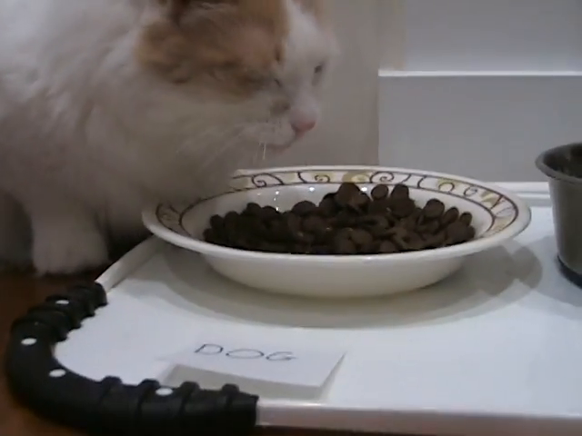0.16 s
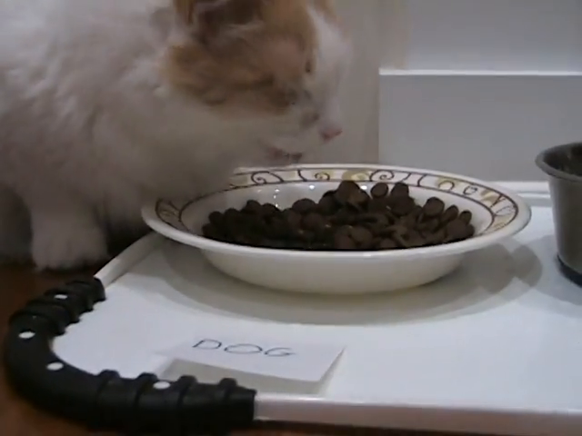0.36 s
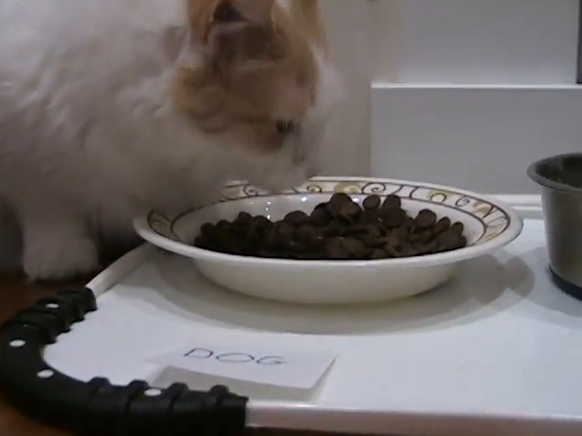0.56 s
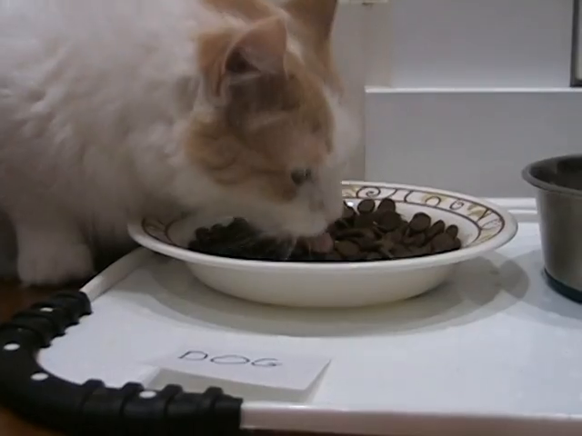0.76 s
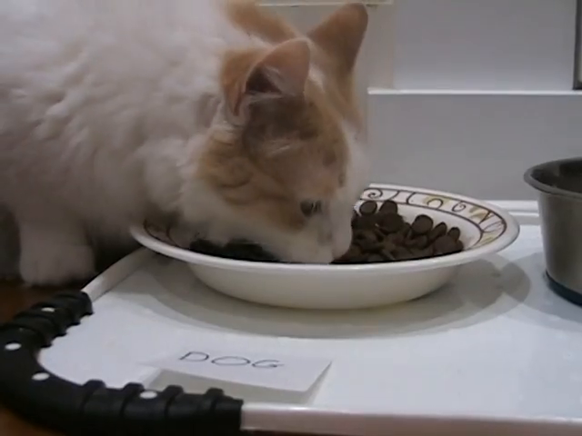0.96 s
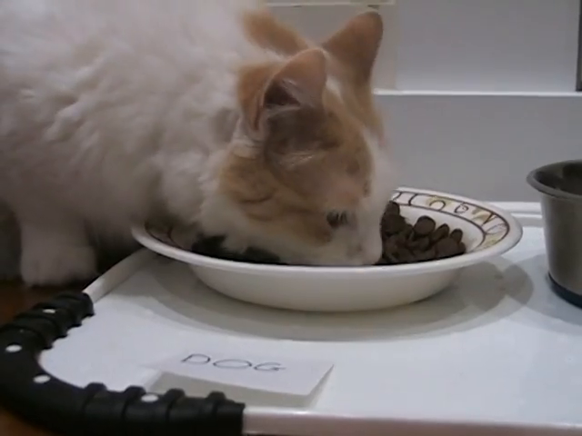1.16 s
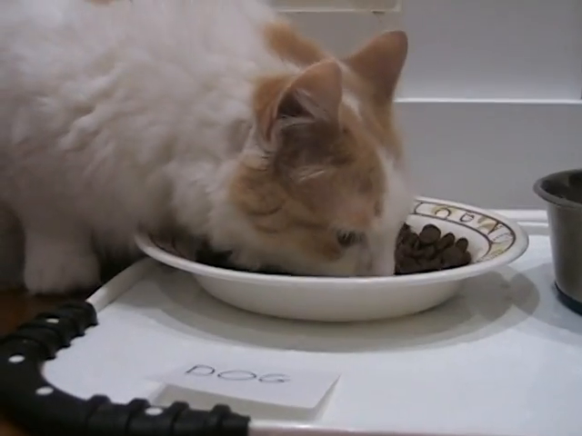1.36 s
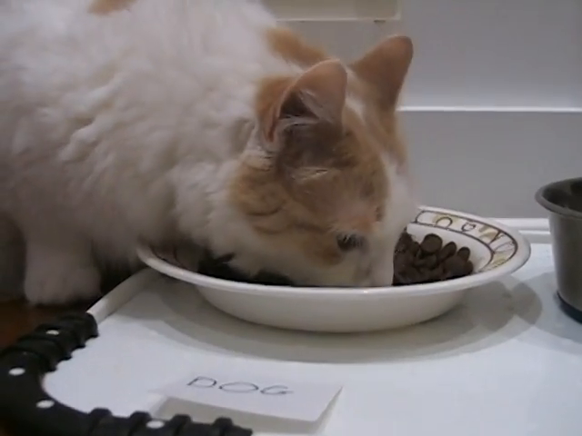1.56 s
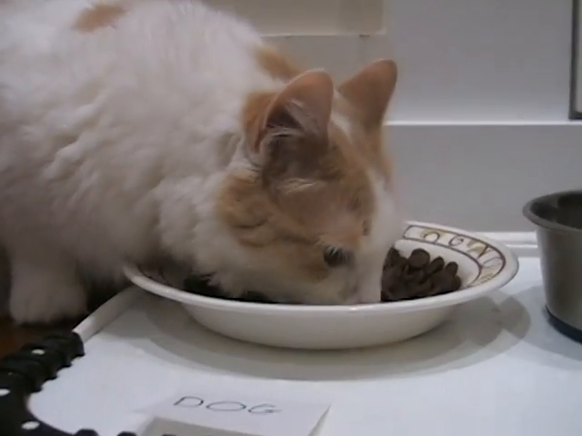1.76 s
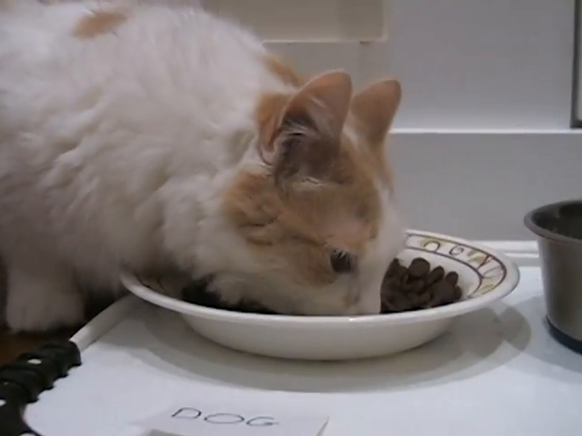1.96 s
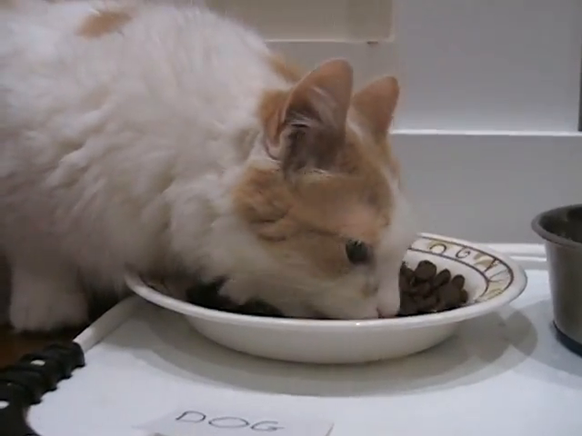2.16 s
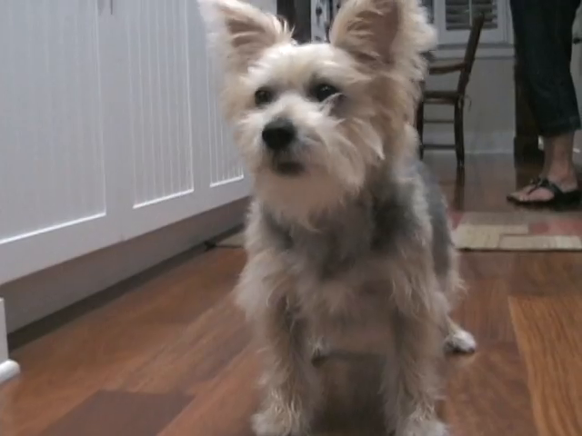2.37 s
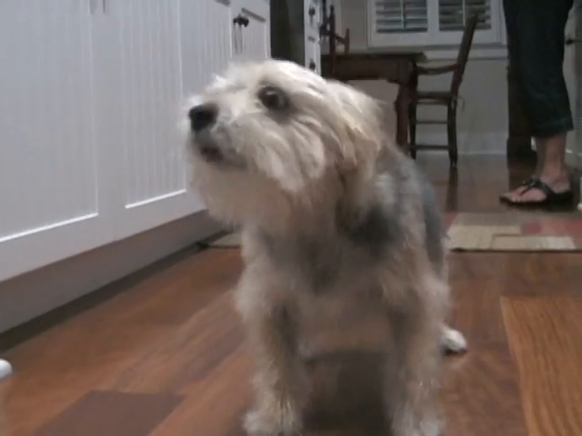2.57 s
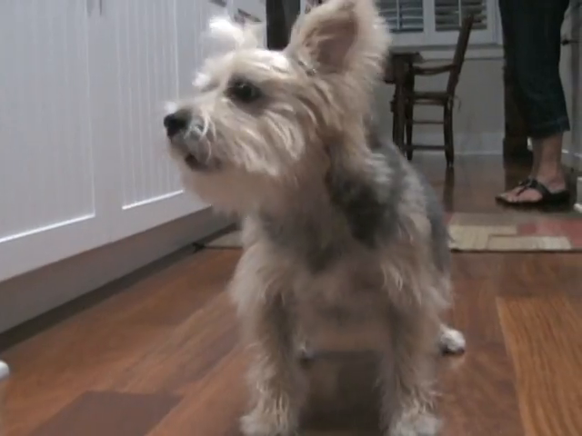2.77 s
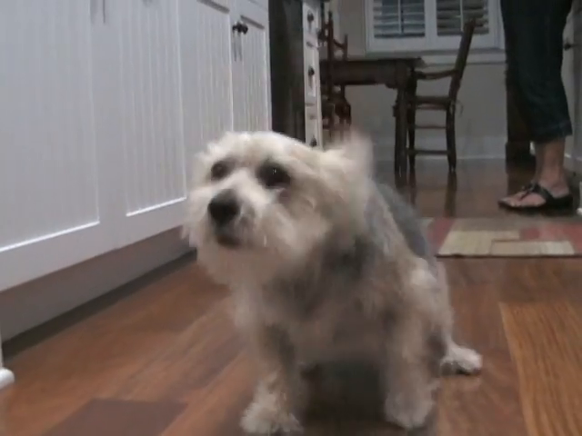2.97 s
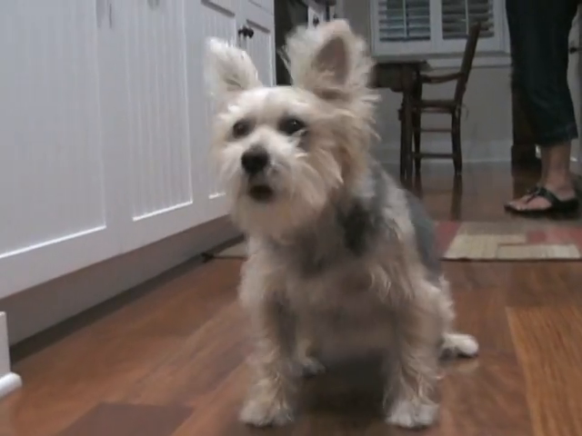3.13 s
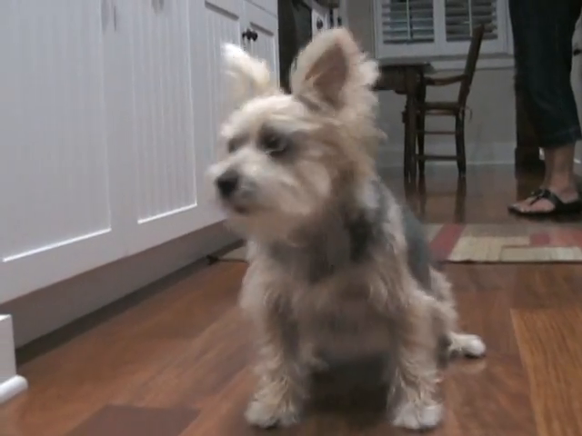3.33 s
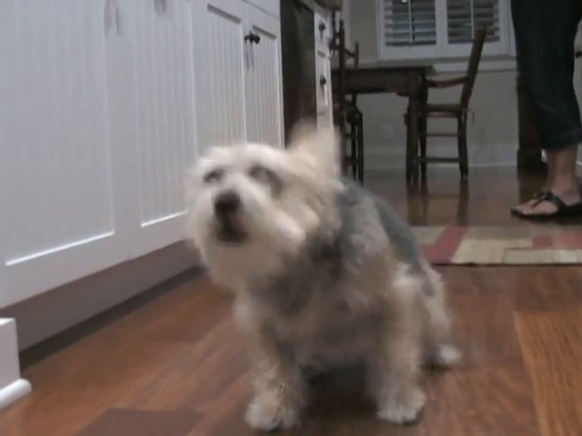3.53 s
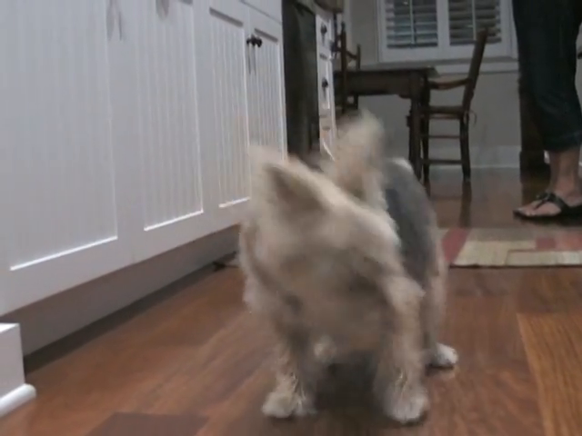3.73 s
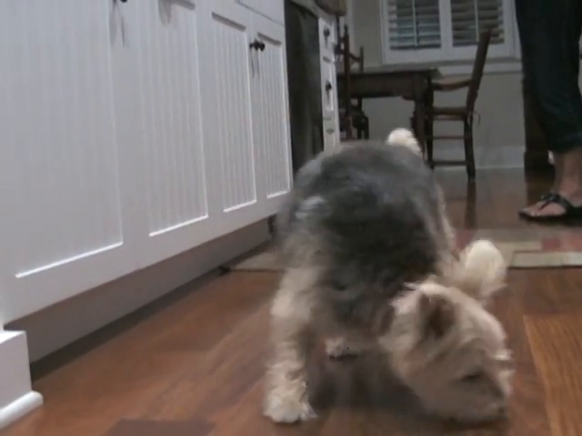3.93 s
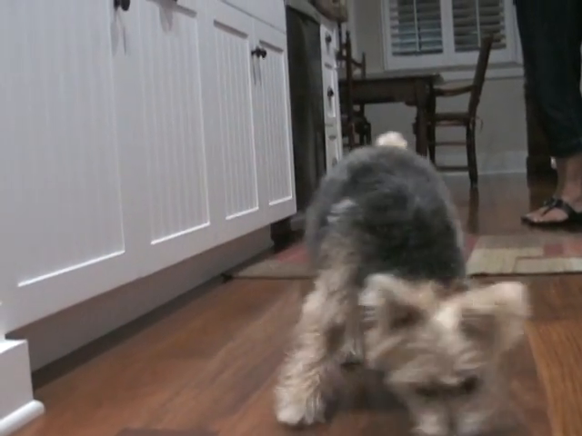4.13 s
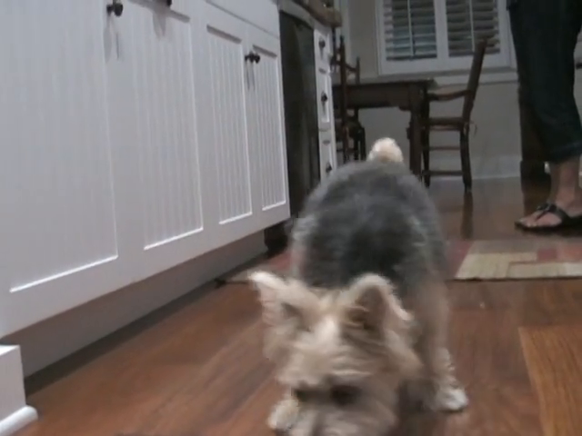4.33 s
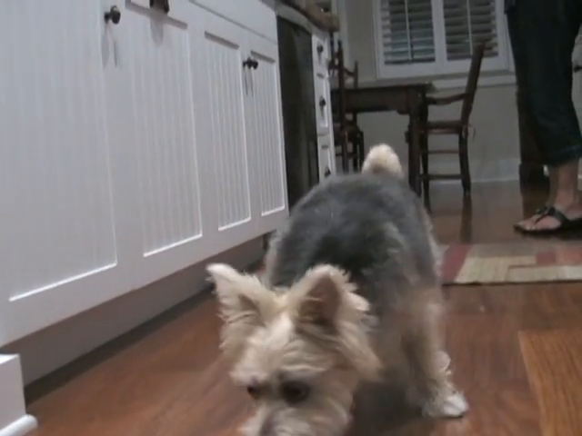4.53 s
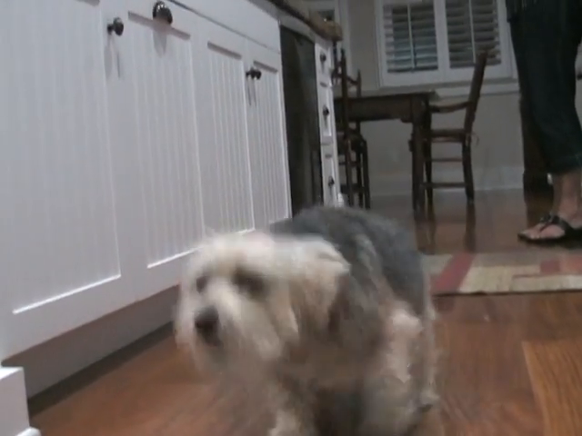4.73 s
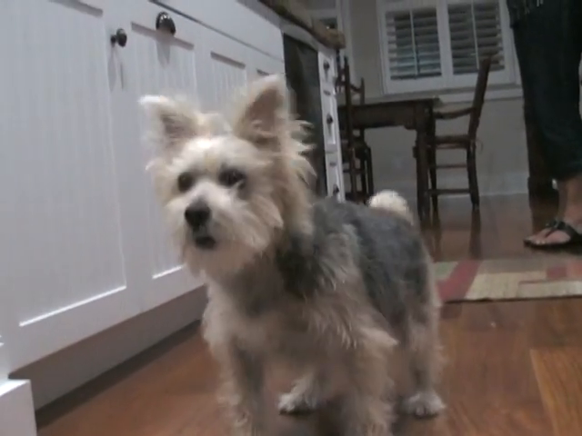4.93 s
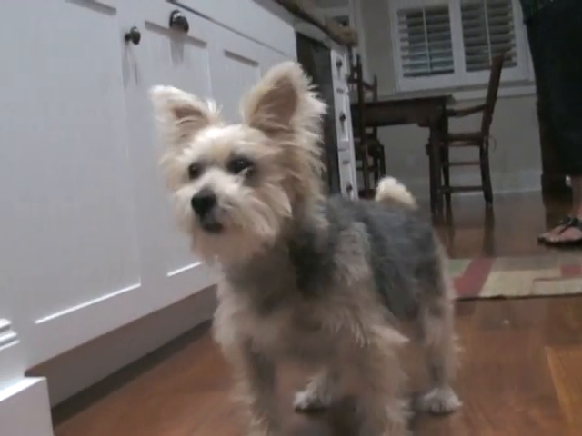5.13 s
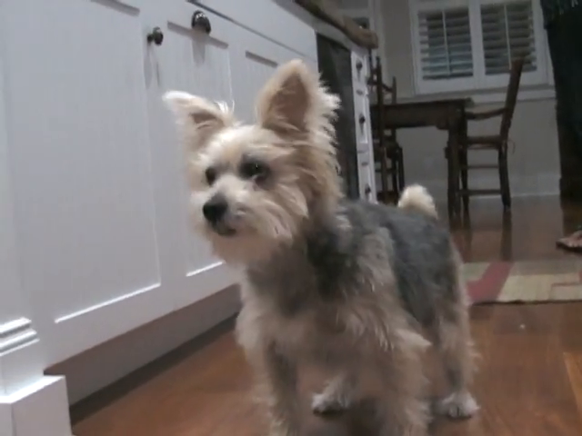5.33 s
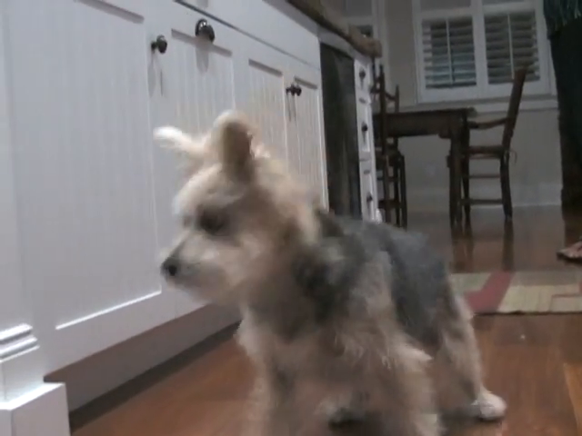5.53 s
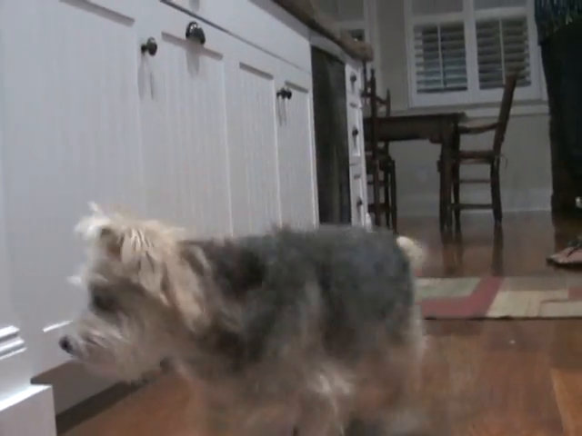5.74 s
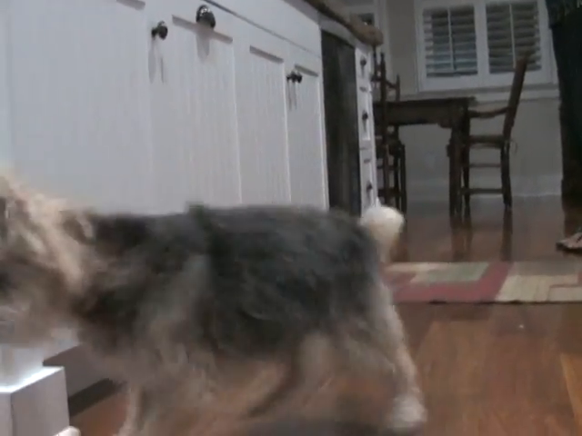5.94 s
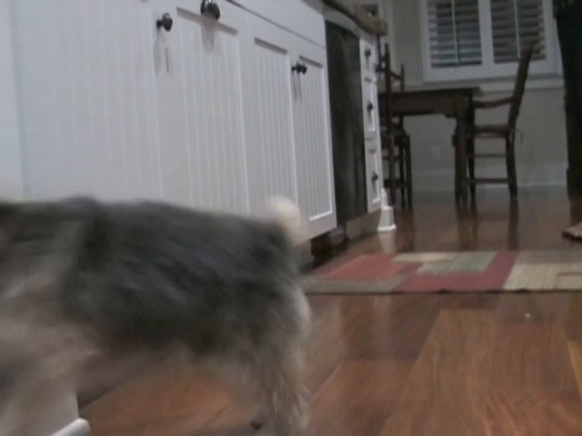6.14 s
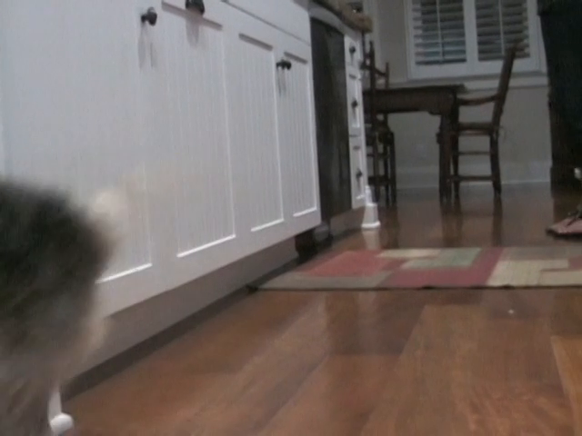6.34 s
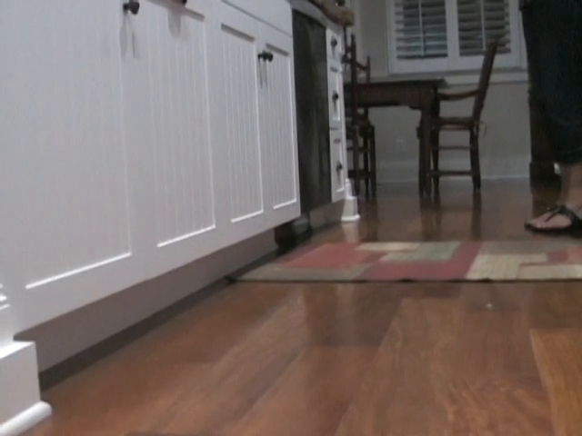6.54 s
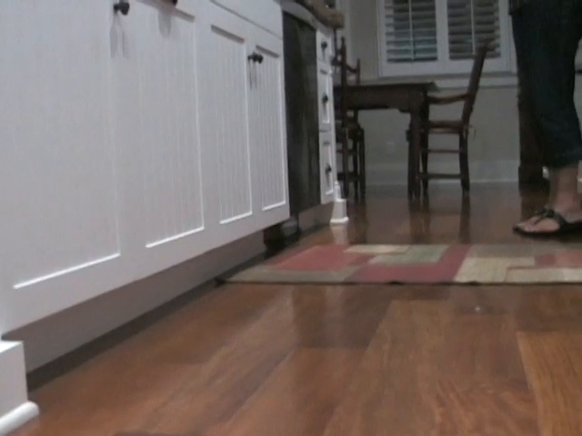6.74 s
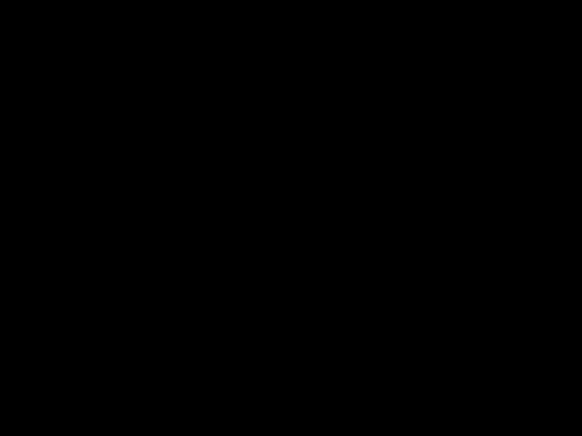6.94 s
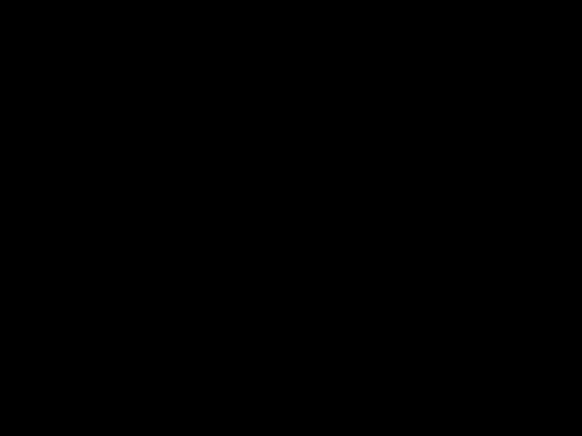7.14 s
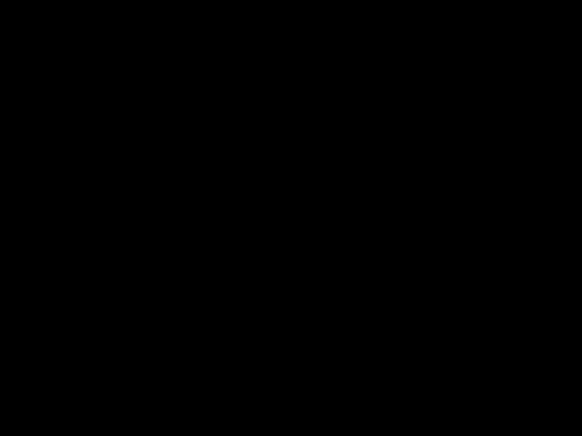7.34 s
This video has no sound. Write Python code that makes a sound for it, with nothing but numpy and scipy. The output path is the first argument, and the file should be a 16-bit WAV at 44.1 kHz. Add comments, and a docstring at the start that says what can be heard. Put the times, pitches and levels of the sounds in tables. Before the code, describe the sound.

From 0 to 2.2 s there is only soft room hiss, a thin steady camera whine, a faint fluttering chirr and a tiny claw tick at 0.3 s. A hard cut lets in the tail of an earlier bark, with slightly darker hiss and faint fridge hum. Claws and pads knock the wooden floor at 2.43 s; sharp, rising yaps burst out at 2.48 and 2.87 s, close and overloaded, the level ducking before the kitchen echo swells. A low throbbing growl with whistling breath at 3.15 s leads into a bark at 3.45 s. A tiny squeak at 4.07 s, a soft snort around 4.3 s, another yap at 4.67 s, then a squeak and paw thump at 4.85 s. From 5.4 to 6.6 s irregular claw ticks and brushing scuffs trot off. Hiss remains until an abrupt stop at 6.8 s, then silence.

```python
"""A bare kitchen in two shots, a small dog close to the camera's microphone.
First come room hiss, motor whine, a faint chirr and one claw click; a cut opens on the echo of an earlier bark.
Claws click and the dog barks twice, growls with a whistling breath, barks, squeaks, snorts, barks and squeaks again.
It trots off on clicking claws before the camera stops. Voices are overtones through a throat, claws are noise cracks.
The barks overload the camera, whose gain control ducks and then lifts the echo."""
import sys
import numpy as np
from scipy import signal
from scipy.fft import rfft, irfft, next_fast_len
from scipy.io import wavfile
from scipy.ndimage import map_coordinates

SR = 44100
rng = np.random.default_rng(int(sys.argv[2]) if len(sys.argv) > 2 else 0)


def generate_wav(sig):
    """Save sig (samples, or channels by samples) to the path in sys.argv[1] as 16-bit PCM at SR."""
    pcm = np.round(np.clip(np.atleast_2d(sig).T, -1, 1) * 32767).astype(np.int16)
    wavfile.write(sys.argv[1], SR, pcm)


N = 326271
T = np.arange(N) / SR
CUT, STOP = 2.214, 6.817  # the second shot begins, the camera stops (s)


# Barks close to the microphone; the first falls before the cut, so only its echo is heard.
# Each row: start in seconds, climb and fall in seconds, first, top and last pitch in Hz, slow start and
# slow finish as exponents, attack in seconds, level in dB, slack in dB, its place as share of the climb,
# loss in dB over the fall, tilt in dB per octave, rasp in seconds, rasp roughness 0-1, mouth in Hz, mouth in dB.
BARK_CALLS = [(1.82, 0.07, 0.015, 560, 721.5, 700, 1.08, 2.74, 0.042, 4, -4.5, 0.57, -36, -5, 0.066, 0.37, 1360, 4.5),
              (2.479, .084, 0.025, 253.3, 759.8, 692, 1.71, 3.8, 0.014, 6, 1.5, 0.46, -32.5, 1.2, 0.043, 0.24, 767, 8.5),
              (2.873, 0.089, 0.063, 387.3, 819, 442, 1.01, 1.08, 0.031, 4, -5.5, 0.65, -16, -0.5, 0.019, 0.3, 1748, 10),
              (3.451, .094, .07, 313, 828, 264.7, .86, 1.6, .021, 6, -7.5, 0.53, -31.5, -2, 0.018, .12, 1760, 8),
              (4.6651, 0.094, 0.017, 292, 741, 715, 0.82, 1.9, 0.011, 4.5, -6, 0.87, -42, -1.5, .016, .2, 2024, 9)]
# The growl between the barks. Each row: time in seconds, pitch in Hz, level in dB.
GROWL_PATH = [(3.155, 150.8, -41), (3.201, 149.8, -27), (3.279, 142.1, -31.5), (3.391, 158.9, -22),
              (3.454, 175.3, -24)]
GROWL_TILT_DB, GROWL_ROUGH = -1.5, 0.19  # tilt per octave at a level of 0 dB; roughness 0-1
GROWL_MOUTH = 463, 8  # Hz, dB
# Floor and cupboard doors answer first. Each row: delay in seconds, level in dB against the direct sound.
FIRST_REFLECTIONS = [(.0032, -13), (.0085, -12), (.015, -9), (.024, -20)]


def dog():
    """Throat sounds reach the microphone direct and by echo; breath noises come without echo."""
    out = np.zeros((2, N + 3 * SR))
    for *call, mouth_hz, mouth_db in BARK_CALLS:
        add(out, call[0], voice(bark(*call), mouth_hz, mouth_db), wet_db=-12, near=FIRST_REFLECTIONS)
    growl = [(s, hz, db, GROWL_TILT_DB + DULLER * db, GROWL_ROUGH) for s, hz, db in GROWL_PATH]
    add(out, GROWL_PATH[0][0], voice(growl, *GROWL_MOUTH), wet_db=-5.5, near=FIRST_REFLECTIONS)
    squeaks(out)
    return out[:, :N] * (T > CUT) + snort() + gasp()


ONSET_DB, SLACK_WIDTH = -37.5, 0.096  # level at the start; width of the slack as share of the climb
DULLER = 0.56  # tilt lost (dB per octave) for each dB under full level
SAG_DB, DARKEN_DB = -4.5, -1.5  # level and tilt (per octave) lost over the climb
SMOOTH, SPENT = .025, .15  # roughness 0-1 in the climb, and added by the end of the fall


def bark(s, climb, fall, first_hz, top_hz, last_hz, slow_start, slow_finish, attack, db,
         slack_db, slack_at, loss_db, tilt_db, rasp, rasp_rough):
    """Rows for the voice: a raspy start, a climb in pitch that slackens in strength midway, a fading fall."""
    t = np.arange(0, climb + fall, .001)
    up = np.minimum(t / climb, 1)
    down = np.maximum(t - climb, 0) / fall
    climbed = 1 - (1 - up ** slow_start) ** slow_finish
    hz = first_hz + (top_hz - first_hz) * climbed + (last_hz - top_hz) * down
    effort_db = ONSET_DB * np.maximum(1 - t / attack, 0) ** 2.38 + loss_db * down
    slack = np.exp(-((up - slack_at) / SLACK_WIDTH) ** 2)
    level_db = db + effort_db + slack_db * slack + SAG_DB * up
    tilt = tilt_db + DULLER * effort_db + DARKEN_DB * up
    rough = SMOOTH + rasp_rough / (1 + (t / rasp) ** 8) + SPENT * down
    return np.transpose([s + t, hz, level_db, tilt, rough])


# Colour of the dog's throat before the mouth adds its peak. Each row: frequency in Hz, level in dB.
THROAT_COLOUR = [(130, -11), (300, -0.5), (700, 6), (1200, 3), (2000, -6), (2500, -22.5), (3200, -19),
                 (4100, -20), (9000, -28.5), (14000, -29.5)]
SKEW = 0.63  # phase of the overtones (rad): how lopsided each cycle is
YAP_HZ, YAP_OCTAVES, YAP_DB = 5400, .12, -18.5  # a high ring that grows with the pitch; dB at 750 Hz
THROB_RATE, THROB_CREST, THROB_DEPTH = 28.5, 3.39, .7  # the growl throbs: per s, a crest at s, depth 0-1


def bump(f, centre, octaves):
    """Bell curve around a frequency on a log axis."""
    return np.exp(-(np.log2((f + 1) / centre) / octaves) ** 2)


def voice(rows, mouth_hz, mouth_db):
    """Vocal folds sound overtones through the throat; when rough, pitch and size tremble and breath hisses."""
    s, *cols = np.transpose(rows)
    t = np.arange(s[0], s[-1], 1 / SR)
    hz, db, tilt_db, rough = (np.interp(t, s, c) for c in cols)
    rough = np.clip(rough, 0, 1)

    def tract_db(f):
        return along(THROAT_COLOUR, f) + mouth_db * bump(f, mouth_hz, 0.097)

    trembling_hz = hz * (1 + .2 * rough * wobble(160, size=len(t)))
    phase = 2 * np.pi * np.cumsum(trembling_hz) / SR
    k = np.arange(1, 25)[:, None]  # overtone numbers
    yap = (hz / 750) ** 2.5 * amp(YAP_DB) * bump(k * hz, YAP_HZ, YAP_OCTAVES)
    size = amp(tilt_db * np.log2(k) + tract_db(k * hz)) + yap
    # the higher the overtone, the less steady
    flutter = (.015 + .3 * rough) * k * [wobble(150, size=len(t)) for _ in k]
    tone = np.sum(size * np.cos(k * phase + SKEW + flutter), axis=0)
    tone /= np.sqrt(np.sum(size ** 2, axis=0) / 2)
    if hz.max() < 200:  # a growl throbs slowly
        tone *= 1 + THROB_DEPTH * np.cos(2 * np.pi * THROB_RATE * (t - THROB_CREST))
    else:  # in a rough bark strong and weak cycles alternate
        tone *= 1 + 0.88 * rough * np.cos(phase / 2)
    hiss = rng.standard_normal(len(t))
    breath = unit(filtered(hiss, lambda f: amp(tract_db(f) - 11.0 * np.log2(1 + f / 500)) * (f > 200)))
    return amp(db + 6 * rough * wobble(60, size=len(t))) * (tone + .8 * rough * breath)


# Noise at the dog's nose. Each row: frequency in Hz, relative level in dB per Hz.
NOSE_COLOUR = [(60, -30.5), (130, -11), (300, -13.5), (800, -12), (1500, -24.5), (2600, -45), (5000, -88.5)]


def snort():
    """A burst of noise with the colour of the nose, its level trembling."""
    puff = gate(4.284, -35.5, (.02, 0.081, .35))
    return puff * amp(1.7 * wobble(130)) * rush(NOSE_COLOUR)


# Whistling resonances of the breath. Each row: frequency in Hz, width in Hz, level in dB.
NOSTRIL_RINGS = [(2413, 72, 5.5), (4300, 280, 0.5), (9500, 1200, -4.5)]


def gasp():
    """Breath whistles under the growl: noise through narrow resonances."""
    return gate(3.22, -46, (.15, .1, .04)) * narrow(NOSTRIL_RINGS)


# Two thin squeaks. Each row: start in seconds, length in seconds, level in dB.
SQUEAK_TIMES = [(4.065, 0.024, -35), (4.854, 0.0099, -31.5)]
# Partials of a squeak. Each row: frequency at its start in Hz, level in dB.
SQUEAK_PARTIALS = [(3340, 0), (6680, 6), (9350, -14)]


def squeaks(out):
    """Sine partials rise slightly in pitch under a half-sine swell."""
    for s, length, db in SQUEAK_TIMES:
        t = np.arange(0, length, 1 / SR)
        rising = t + .08 * t * t
        tone = sum(amp(level) * np.sin(2 * np.pi * hz * rising) for hz, level in SQUEAK_PARTIALS)
        add(out, s, amp(db) * np.sin(np.pi * t / length) * tone, wet_db=-17.5)


# Claws on the kitchen boards. Each row: time in seconds, peak of the crack in dB, click pitch in Hz.
CLAW_CLICKS = [(0.3, -31.5, 6300), (2.4283, -10.5, 4100), (2.4397, -16, 6770), (2.4495, -2.5, 4250),
               (2.657, -14.5, 2400), (3.0836, -10, 3500), (3.8383, -24.5, 8200), (4.1745, -29, 8600),
               (4.853, -13, 4220), (4.878, -20, 3960), (5.356, -29, 2280), (5.58, -18, 1800),
               (5.5942, -23, 1820), (5.611, -30, 1500), (5.679, -27, 3020), (5.747, -17, 3560),
               (5.777, -16, 7000), (5.834, -18.5, 5870), (5.91, -24, 6680), (5.959, -22.5, 6440),
               (5.989, -26.5, 3940), (6.0415, -22, 3070), (6.131, -21, 8800), (6.173, -24, 2550),
               (6.184, -23.5, 2360), (6.3495, -19.5, 2950), (6.366, -21, 2600), (6.549, -23.5, 2420),
               (6.561, -28, 3450), (6.598, -28, 1000), (6.639, -26.5, 2280)]
# Colour of a claw's crack and of the scuffs. Each row: frequency in Hz, relative level in dB per Hz.
CLAW_COLOUR = [(500, -40), (1200, -2.5), (2500, -5.5), (4000, -3.5), (7000, -9), (10000, -10.5),
               (12500, -15), (14500, -54.5)]
# Resonances of the floor boards. Each row: frequency in Hz, width in Hz, level in dB.
BOARD_MODES = [(148, 20, -13.5), (508, 100, -4.5), (950, 190, -1)]
# A pad lands on the board. Each row: time in seconds, peak in dB.
PAD_THUMPS = [(2.4281, -13), (2.4403, -8), (2.4492, -6.5), (3.0838, -15.5), (4.851, -3), (5.356, -37),
              (5.5942, -26), (6.5994, -23.5), (6.638, -27.5)]
# Pads and fur brush the boards. Each row: crest in seconds, level in dB.
SCUFF_TIMES = [(5.588, -32.5), (5.73, -36.5), (5.92, -38.5), (6.14, -47), (6.37, -41.5)]
SCUFF_SHAPE = 0.19, 0.0033, 0.38  # attack, hold, release (s)
PATTER_START, PATTER_END, PATTER_DB = 5.5, 6.0, -25  # ticks scattered in the trot: s, s, highest peak
CRACK_T60 = .022  # s
KNOCK_DB = -16  # the board under a claw, against the click


def paws():
    """Each claw cracks around its own pitch and knocks the board; the pads thump it and scuff in grains."""
    out, t = np.zeros((2, N + 3 * SR)), np.arange(SR // 16) / SR
    dry = np.zeros(N + SR)
    knock = filtered(t * np.exp(-t / 0.00067), modes(BOARD_MODES))
    knock = knock / abs(knock).max()
    patter = [(PATTER_START + (PATTER_END - PATTER_START) * a, PATTER_DB - 5 * b, 2300 * 4 ** c)
              for a, b, c in rng.random(size=(9, 3))]
    for s, db, hz in CLAW_CLICKS + patter:
        def click_colour(f):
            ring = modes([(hz, .55 * hz, 0)])(f) ** 2
            return .95 * amp(along(CLAW_COLOUR, f)) + np.sqrt(4000 / hz) * ring

        crack = rng.standard_normal(len(t)) * amp(-60 * t / CRACK_T60)
        crack = filtered(crack, click_colour)
        dry[round(s * SR):][:len(t)] += amp(db) * (crack / abs(crack).max() + amp(KNOCK_DB) * knock)
    for s, db in PAD_THUMPS:
        dry[round(s * SR):][:len(t)] += amp(db) * knock
    add(out, 0, dry[:N], wet_db=-10.5)
    brushing = sum(gate(s, db, SCUFF_SHAPE) for s, db in SCUFF_TIMES)
    grains = amp(2.2 * wobble(55) + 3.5 * wobble(500))
    return out[:, :N] + brushing * unit(grains * rush(CLAW_COLOUR))


# Hiss of the room, one list for each shot. Each row: frequency in Hz, relative level in dB per Hz.
ROOM_HISS = ([(20, -29), (70, -5), (130, -1.5), (260, 1.5), (560, -5), (1100, -10), (1250, -16),
             (2700, -19), (3400, -22), (5000, -23), (6300, -29), (7300, -36), (11500, -34.5), (13600, -91)],
             [(20, -39.5), (87, -6.5), (190, -4), (355, -6), (717, -8.5), (1010, -13.5), (1200, -14),
             (2700, -26.5), (5000, -26), (6300, -31.5), (7300, -43.5), (11500, -37.5), (13600, -89.5)])
# Camera motor, right at the microphone. Each row: frequency in Hz, level in dB.
MOTOR_WHINE = [(802, -57.5), (2073, -67), (4495, -66), (4920, -72), (5200, -70), (10395, -68)]
# Fridge, heard in the second shot. Each row: frequency in Hz, level in dB.
FRIDGE_HUM = [(119, -51.5), (350, -52)]


def air():
    """Shaped noise for the hiss of each shot, wavering sines for the camera's motor and the fridge."""
    second = T > CUT
    first_hiss, second_hiss = (amp(-41) * rush(spectrum) for spectrum in ROOM_HISS)
    hiss = np.where(second, second_hiss, first_hiss)
    whine = sum(line(hz, db) for hz, db in MOTOR_WHINE)
    hum = sum(line(hz, db) for hz, db in FRIDGE_HUM)
    return hiss * amp(0.47 * wobble(0.68)) + whine + ~second * chirr() + second * hum


def line(hz, db):
    """A sine whose level and phase waver."""
    return np.sqrt(2) * amp(db + 1.6 * wobble(16)) * np.sin(2 * np.pi * hz * T + 0.27 * wobble(6))


# A faint chirr behind the first shot. Each row: frequency in Hz, width in Hz, level in dB.
CHIRR_RINGS = [(2520, 110, 8), (3450, 360, 12)]


def chirr():
    """Short uneven puffs of narrow noise, 23 a second, in groups about five times a second."""
    puffs = np.cos(np.pi * 23 * T + .4 * wobble(5)) ** 4
    groups = 1 + .5 * np.cos(2 * np.pi * 5.25 * (T - .8))
    uneven = amp(1.5 * wobble(20))
    return amp(-59.5) * unit(puffs * groups * uneven * narrow(CHIRR_RINGS))


# Decay of the bare kitchen. Each row: frequency in Hz, time to fall 60 dB in seconds.
KITCHEN_T60 = [(100, 0.2), (400, 0.37), (750, 0.84), (2000, 0.83), (4000, 0.63), (10000, 0.57)]
# Colour the walls give the echo. Each row: frequency in Hz, level in dB.
WALL_COLOUR = [(150, 2.5), (620, -2), (740, 2.5), (900, -1), (1400, -1.5), (1700, -8.5), (1960, -2.5),
               (2500, -3.5), (6000, -3), (10000, -7.5)]


def echo(x):
    """A fresh noise tail of the kitchen; each frequency dies at its own speed."""
    hz, t, z = signal.stft(rng.standard_normal((2, 3 * SR // 2)), SR, nperseg=256)
    rise = 1 - np.exp(-t / 0.034)  # reflections gather after the direct sound
    decay = amp(-60 * t / along(KITCHEN_T60, hz)[:, None])
    tail = signal.istft(z * rise * decay, SR, nperseg=256)[1]
    tail = filtered(tail, lambda f: amp(along(WALL_COLOUR, f)))
    tail = pair(tail, [(300, 0.9), (1400, 1.0), (4000, .7)])
    return signal.fftconvolve(x[None], tail / np.linalg.norm(tail[0]), axes=1)


def add(out, s, x, wet_db, near=()):
    """Place a sound, its first reflections and its echo at time s."""
    start, wet = round(s * SR), amp(wet_db) * echo(x)
    for delay, db in [(0, 0), *near]:
        out[:, start + round(delay * SR):][:, :len(x)] += amp(db) * x
    out[:, start:start + wet.shape[1]] += wet


# Spread of noise across the two microphone ports. Each row: frequency in Hz, left-right likeness.
PORT_LIKENESS = [(60, 0.21), (180, .7), (500, .8), (1400, 0.85), (3400, 1), (6200, .55), (12000, 0.78)]


def rush(spectrum):
    """Stereo noise of rms 1 with the given spectrum."""
    noise = filtered(rng.standard_normal((2, N)), lambda hz: amp(along(spectrum, hz)))
    return unit(pair(noise, PORT_LIKENESS))


def pair(x, alike):
    """Two unrelated signals mixed into a left and right of given likeness."""
    def mid_and_side(hz):
        turn = np.arccos(np.clip(along(alike, hz), -1, 1)) / 2
        return np.array([np.cos(turn), np.sin(turn)])

    mid, side = filtered(x, mid_and_side)
    return np.array([mid + side, mid - side])


def narrow(table):
    """Noise of rms 1 through steep resonances."""
    return unit(filtered(rng.standard_normal(N), lambda f: modes(table)(f) ** 2))


def modes(table):
    """Causal response of (Hz, width, dB) resonances with alternating sign."""
    return lambda f: sum((-1) ** k * amp(db) * 1j * f * w / (c * c - f * f + 1j * f * w)
                         for k, (c, w, db) in enumerate(table))


def filtered(x, response):
    """x times a complex response of frequency."""
    m = next_fast_len(x.shape[-1] + 8192)
    return irfft(rfft(x, m) * response(np.fft.rfftfreq(m, 1 / SR)), m)[..., :x.shape[-1]]


def gate(s, db, shape):
    """Gain that climbs 40 dB to its level at s, holds and drops 40 dB again."""
    attack, hold, release = shape
    corners = s + np.cumsum([-attack, attack, hold, release])
    return amp(db + np.interp(T, corners, [-40, 0, 0, -40], left=-120, right=-120))


def wobble(rate, size=N):
    """A smooth random curve, rate knots a second."""
    knots = rng.standard_normal(int(size * rate / SR) + 4)
    return map_coordinates(knots, [np.arange(size) * rate / SR])


def along(points, hz):
    """(Hz, value) points read on a log axis."""
    f, v = np.transpose(points)
    return np.interp(np.log(hz + 1), np.log(f + 1), v)


def amp(db):
    """Decibels to amplitude."""
    return 10 ** (np.asarray(db) / 20)


def unit(x):
    """Scale to rms 1."""
    return x / np.sqrt(np.mean(x ** 2) + 1e-20)


def lagged(x, seconds):
    """One-pole smoothing."""
    pole = np.exp(-1 / (seconds * SR))
    return signal.lfilter([1 - pole], [1, -pole], x)


def scene():
    """The dog, its paws and the background together."""
    return dog() + paws() + air()


# Unequal colour of the microphone ports. Each row: frequency in Hz, left minus right in dB.
PORT_COLOUR = [(150, -3.5), (400, -2.4), (1400, -0.5), (4500, -0.5), (6200, -2), (8000, 0.5)]
LEFT_DELAY = 4.3e-5  # s
TOP_HZ = 14000  # the camera's treble limit


def record(dry):
    """Ports of unequal colour, the left late; gain control too slow for the first blast, which clips."""
    def ports(hz):
        colour = amp(along(PORT_COLOUR, hz) * np.array([[.5], [-.5]]))
        return colour * np.exp(-2j * np.pi * hz * np.array([[LEFT_DELAY], [0]]))

    def passband(hz):
        return 1j * hz / (25 + 1j * hz) / (1 + (hz / TOP_HZ) ** 40)

    x = filtered(dry, ports)
    level_db = 10 * np.log10(lagged(np.mean(x ** 2, axis=0), 0.0077) + 1e-12)
    need_db = 0.55 * np.maximum(level_db + 21.5, 0)
    release = 55 * T  # the gain returns at a steady number of dB a second
    duck_db = lagged(np.maximum.accumulate(need_db + release) - release, 0.031)
    x = x * amp(-duck_db)
    x = x / (1 + abs(x / 1.03) ** 6) ** (1 / 6)  # overload rounds the peaks
    return np.clip(filtered(x, passband), -1, 1) * (T < STOP)


dry = scene()
out = record(dry)
generate_wav(out)
```